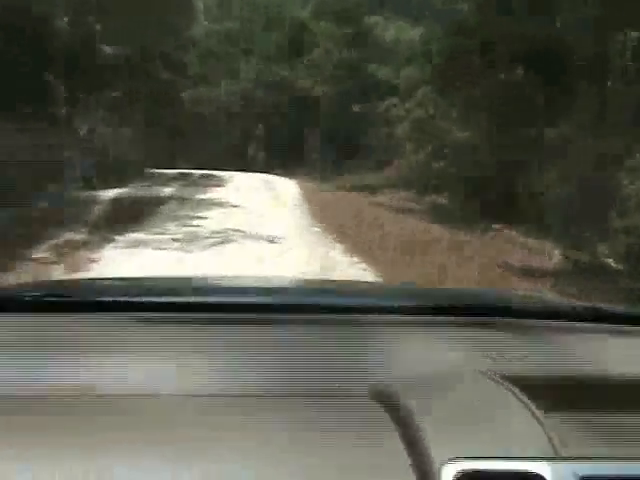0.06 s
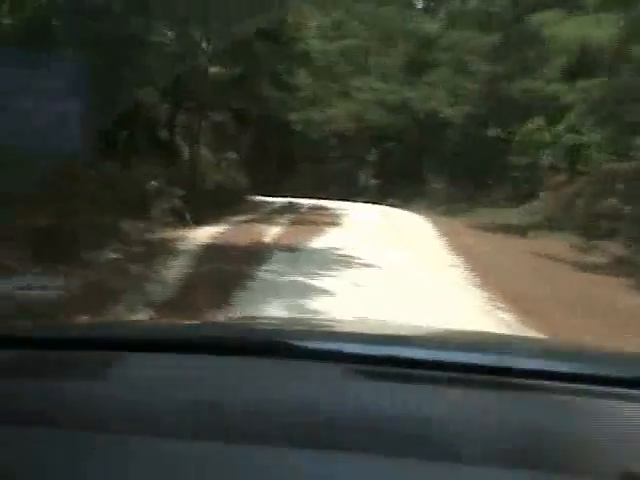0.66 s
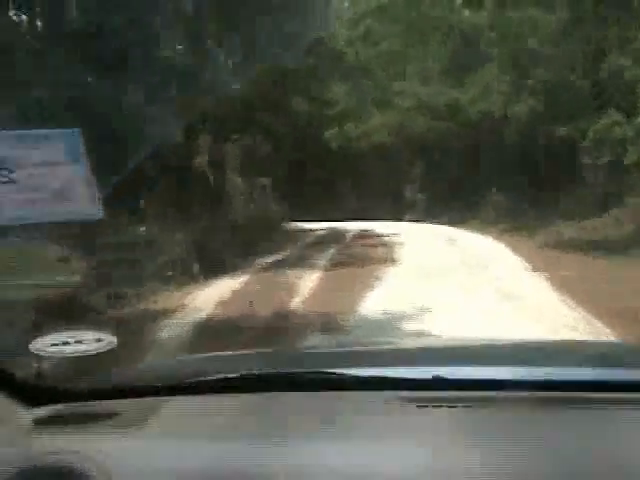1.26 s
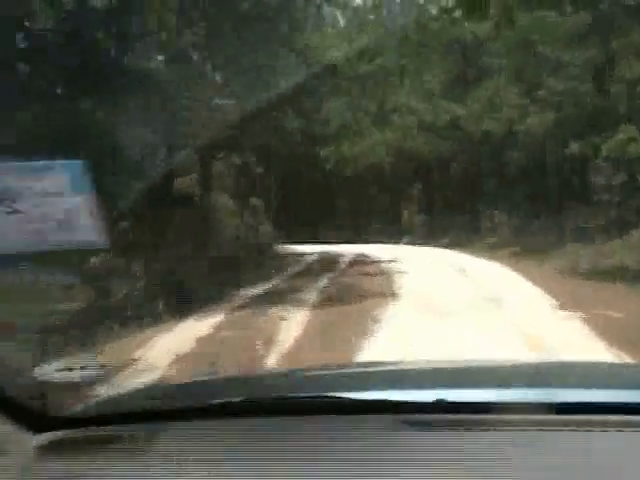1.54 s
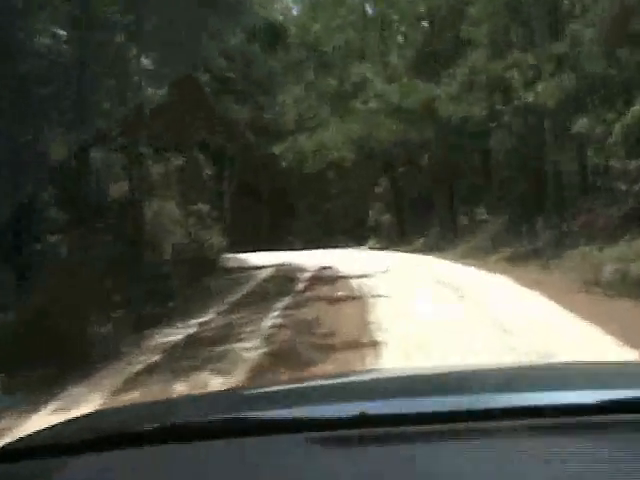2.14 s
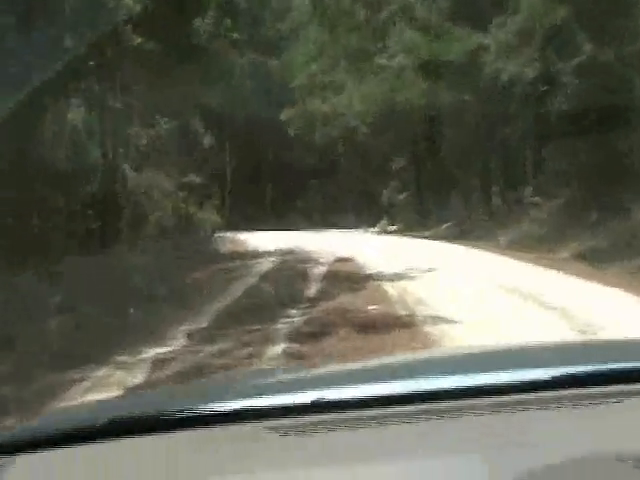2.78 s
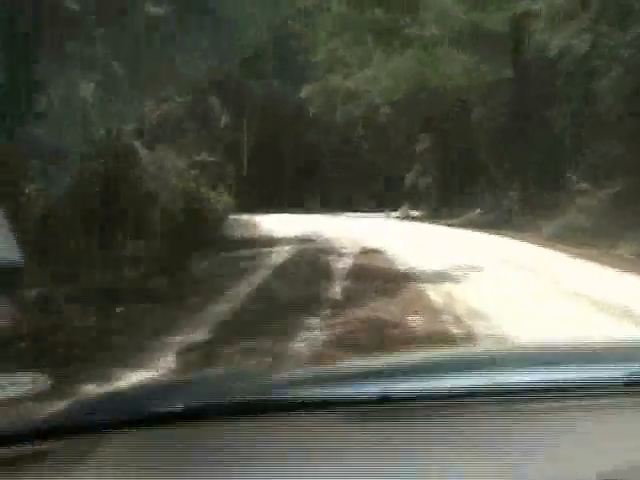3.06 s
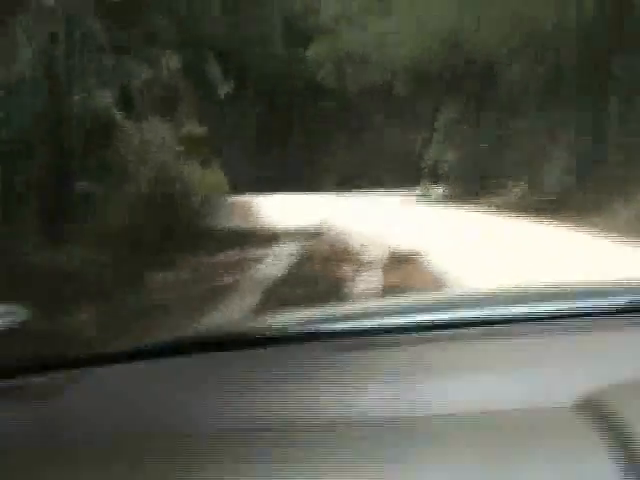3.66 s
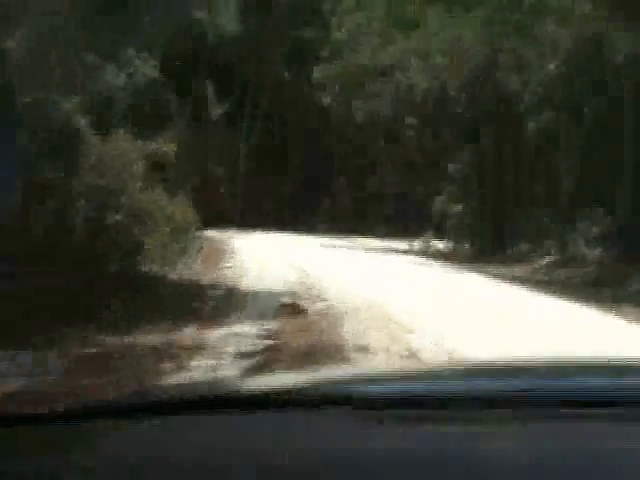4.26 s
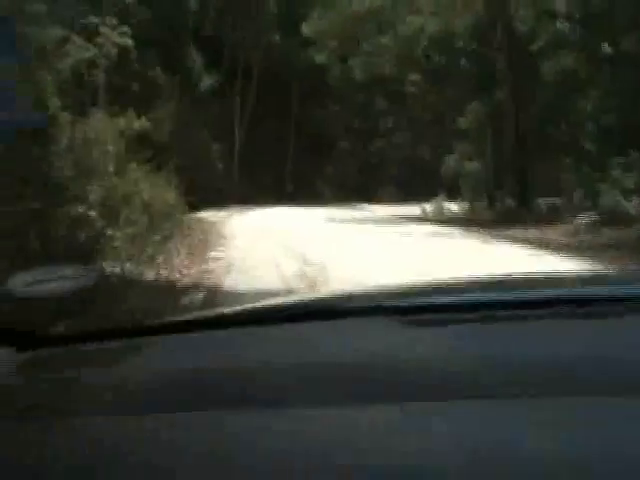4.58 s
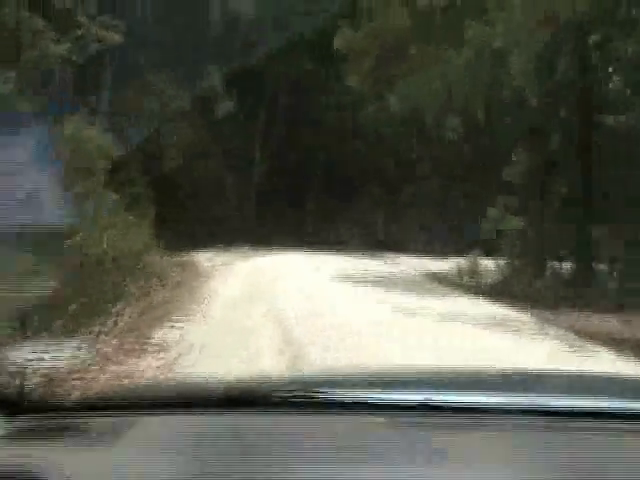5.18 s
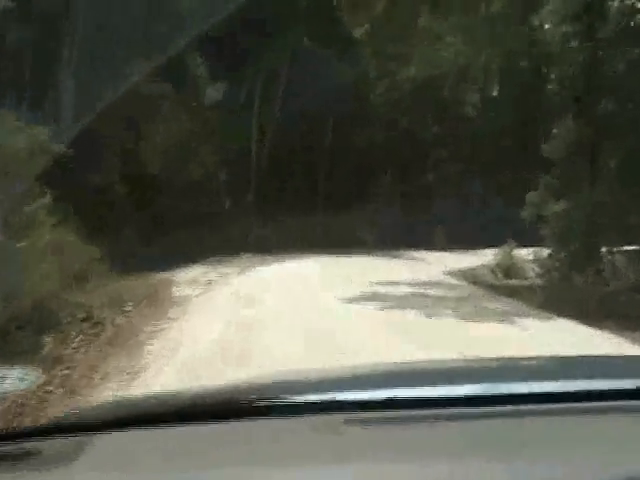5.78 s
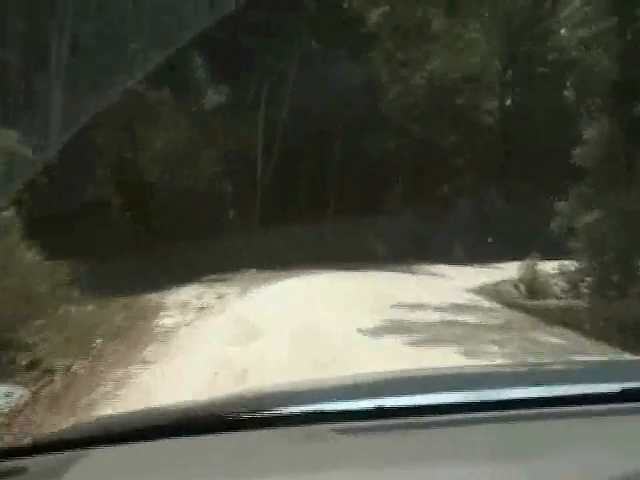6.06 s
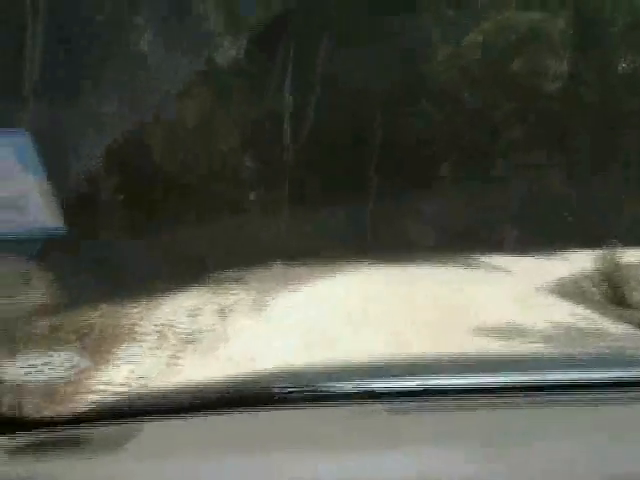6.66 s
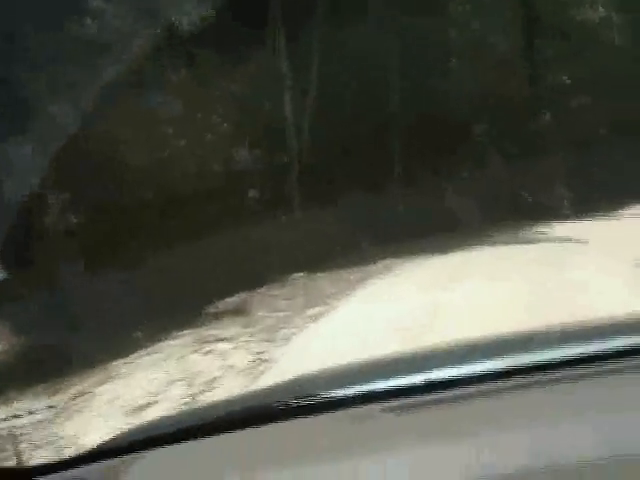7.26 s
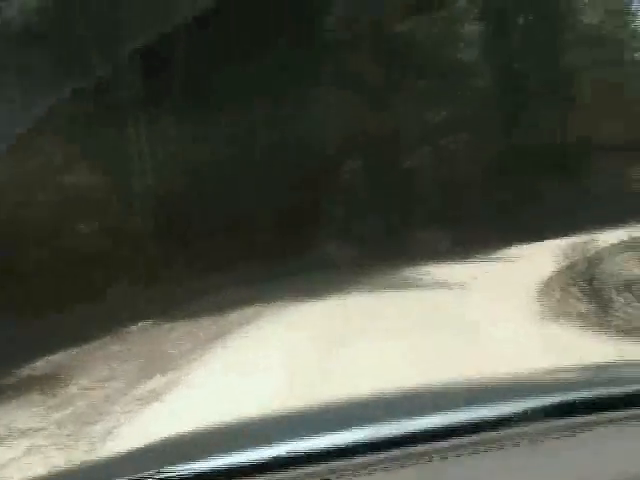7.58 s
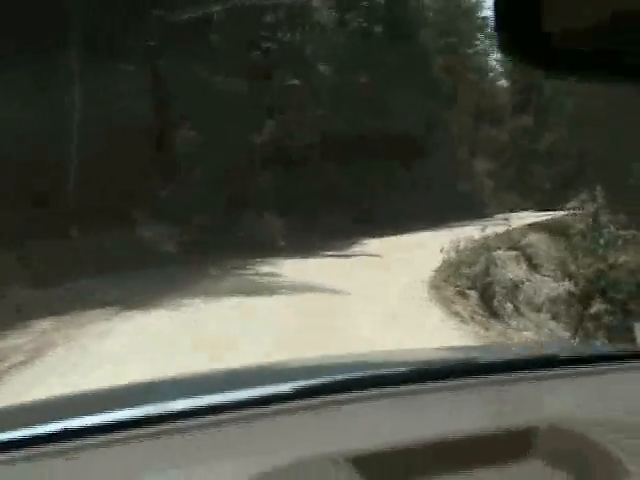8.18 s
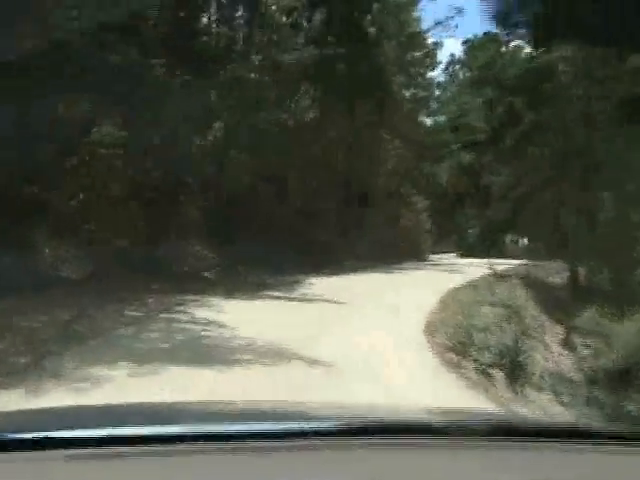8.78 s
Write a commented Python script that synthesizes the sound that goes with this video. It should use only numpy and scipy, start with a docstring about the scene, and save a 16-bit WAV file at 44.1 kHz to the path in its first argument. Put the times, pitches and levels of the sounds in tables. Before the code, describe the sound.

From a microphone inside a truck cab, a deep tyre rumble and a low engine hum run under the crunch of a loose dirt road. Ruts thump through the floor at the start and again late on. Stones strike the underside with short ringing knocks, most thickly around the middle, among light rattles and small squeaks. A droning tone swells and fades, and the engine softens towards the end, over a faint hiss.

```python
"""A boom through the floor and a low rumble: a pickup on a loose dirt road, heard from the cab.
Ruts shake the body, gravel crunches under the tyres, sand sprays in the wheel wells and stones
knock on the underbody. The engine hums and the cab drones; tyres and engine ease off for a bend.
Loose trim rattles and a dry joint squeaks as the truck sways, over a faint sizzle and hiss."""
import sys
import numpy as np
from scipy import signal
from scipy.fft import rfft, irfft
from scipy.io import wavfile
from scipy.ndimage import uniform_filter1d

SR = 44100
rng = np.random.default_rng(int(sys.argv[2]) if len(sys.argv) > 2 else 0)


def write(x):
    x = np.atleast_2d(x).T
    wavfile.write(sys.argv[1], SR, np.round(np.clip(x, -1, 1) * 32767).astype(np.int16))


N = 397782
TIME, FREQS = np.arange(N) / SR, np.fft.rfftfreq(N, 1 / SR)
SIDES = np.array([[1], [-1]])  # plus for the left ear, minus for the right

# how rutted the road is: t/s, roughness/dB
ROAD_ROUGHNESS = [(0, 2), (0.77, 3.5), (1.0, 0.5), (1.25, 3.5), (1.85, 2.5), (3.0, -4), (3.4, 1.5),
                  (4.13, -2.5), (5.0, -0.4), (5.5, 3), (6.75, 2), (7.98, -5.5), (8.35, 0.5)]
# how much loose sand lies on it: t/s, looseness/dB
ROAD_LOOSENESS = [(0, 3.5), (1.0, 1.5), (1.5, 4), (2.75, -5), (3.0, 0.5), (4.75, 3.5), (5.1, 1.4),
                  (6.3, -1), (6.55, 1.5), (7.6, -4.5), (8.35, 2.5)]
# a tyre flings grit into the wheel well: middle t/s, level/dB
GRIT_FLINGS = [(0.105, -43.5), (0.53, -42), (3.35, -43), (3.595, -46), (3.68, -43), (6.51, -43),
               (8.66, -46.5)]
# jolts that boom through the floor: t/s, f/Hz, level/dB
FLOOR_JOLTS = [(0.014, 127, -6), (1.268, 152, -10), (7.027, 125, -7.5), (8.083, 124.5, -11),
               (8.416, 124, -3)]
# stones hitting the underbody: t/s, level/dB, treble share/dB, strongest ring f/Hz
STONE_HITS = [(0.276, -15.5, -13, 1260), (0.433, -19.5, -30, 1290), (0.531, -22.5, -26, 1150),
              (1.526, -24, -29, 1170), (2.667, -18, -28, 1140), (3.283, -26, -19, 1150),
              (3.469, -24, -29, 1190), (3.669, -24, -18, 895), (3.712, -25, -24, 1040),
              (3.745, -19, -43, 820), (3.847, -28, -33, 1160), (3.98, -16, -21, 840),
              (4.127, -21.5, -28, 1140), (4.414, -13.5, -23, 954), (4.627, -12.5, -14, 993),
              (4.679, -21.5, -20, 1120), (4.753, -23.5, -23, 1190), (5.415, -17, -19, 1485),
              (6.071, -22, -36, 860), (6.384, -21.5, -25, 1210), (6.531, -22, -36, 794),
              (6.715, -20.5, -28, 845), (6.991, -20.5, -22.5, 920), (7.939, -24.5, -36, 1110),
              (8.398, -17, -20.5, 1085), (8.414, -13.5, -41, 895), (8.426, -21, -45, 764),
              (8.522, -24, -43, 890), (8.901, -13, -18.5, 1030)]
# the notes the underbody rings at: f/Hz, level/dB, time to fade by 60 dB/s
UNDERBODY_NOTES = [(441, -16, 0.23), (594, -19, 0.044), (670, -9, 0.061), (927, -5, 0.11),
                   (1166, -4.5, 0.16), (1523, -4, 0.07), (2070, -4, 0.048)]
# the engine, easing off for the bend: t/s, firing f/Hz, level/dB
ENGINE_COURSE = [(0, 59.2, -38), (1.2, 58.6, -34.5), (2.5, 57.6, -40), (3.3, 56.6, -37), (4.1, 55.7, -39.5),
                 (5.5, 55.6, -35), (6.8, 58.3, -35.5), (7.5, 55.5, -45), (9.02, 54, -45)]
# the tones in its hum: multiple of the firing rate, relative level/dB
ENGINE_HARMONICS = [(1, 3), (2, 10.5), (3, -5), (4, -4.5), (5, 3.5), (9, -17)]
# drones of the cab: middle t/s, half length/s, f/Hz, level/dB
CAB_DRONES = [(4.8, 0.92, 201.5, -33.5), (5.898, 0.9, 181.8, -24), (7.59, 1, 125.4, -24.5)]
# ticks of loose trim and small metal parts: t/s, level/dB, ring f/Hz
TRIM_TICKS = [(2.0276, -33.5, 6000), (2.135, -41.5, 8300), (2.324, -34, 7100), (2.9163, -38.5, 6400),
              (3.037, -36, 8550), (3.168, -34.5, 3120), (3.44, -37, 3400), (4.663, -36, 3220),
              (5.102, -35, 3130), (6.022, -36.5, 4100), (6.052, -37, 4000), (6.285, -37.5, 4160),
              (6.345, -39, 3150), (7.491, -38, 8500), (7.749, -38.5, 2750), (8.24, -37, 3240),
              (8.708, -39, 3250)]
# chirps of the dry joint: middle t/s, level/dB, f/Hz
JOINT_CHIRPS = [(2.882, -40, 2210), (3.012, -35, 2210), (3.35, -38, 2260), (4.075, -40, 2310),
                (4.162, -37, 2325), (4.535, -37, 2320), (4.605, -38, 2300), (6.36, -42, 2235),
                (6.71, -44, 2370), (7.744, -39, 2250), (7.904, -36.5, 2260), (8.497, -37, 2340),
                (8.875, -37, 2240), (8.935, -37, 2250)]
# the high sizzle coming and going: t/s, level/dB
SIZZLE_COURSE = [(0, -83), (4, -60), (6.4, -66.5), (6.7, -87)]

# The colour of each noise, or how strong it is from low to high: f/Hz, relative level/dB
SHAKE_COLOUR = [(10, -58.5), (22, 2.5), (33, 10), (39, 8), (46, -0.5), (60, 5), (85, 2.5), (105, -5),
                (160, -66.5)]  # the shaking body
RUMBLE_COLOUR = [(60, -26), (100, -7.5), (121, 2), (145, -8), (180, -8), (260, -17), (300, -16),
                 (345, -21.5), (410, -21), (460, -26), (510, -21), (600, -37.5), (1000, -41), (3000, -99)]  # the tyre tread
GRAVEL_COLOUR = [(250, -4), (600, 4), (1000, -2.5), (1550, -6.5), (2200, -13.5), (3000, -22), (5000, -28),
                 (12000, -42)]  # crunching gravel
SAND_COLOUR = [(1200, -3.5), (2800, 14), (4200, 7.5), (7500, 4.5), (9200, -5.5), (13000, -8)]  # spraying sand
PEBBLE_COLOUR = [(400, -9), (850, 15.5), (1250, 3), (2500, -12), (9000, -18)]  # pattering pebbles
KNOCK_COLOUR = [(100, -7.5), (400, 11), (800, 4.5), (1300, 0.5), (2200, -4.5), (4000, -12.5), (9000, -38.5)]  # a stone's dull knock
CRACK_COLOUR = [(800, -9), (2200, 8.5), (4200, 6.5), (8000, 2.5), (13000, -13.5)]  # a stone's sharp crack
TRIM_COLOUR = [(1000, 3), (2600, 14.5), (8200, 4), (13000, -24)]  # loose trim
SIZZLE_COLOUR = [(9400, -18), (10400, 11), (11700, 1), (12900, 9), (13500, -7)]  # the high sizzle
HISS_COLOUR = [(10500, 3), (13000, -10)]  # microphone hiss

# how wide the sound is: f/Hz, level of what differs between the ears against what they share/dB
STEREO_WIDTH = [(60, -33), (130, -15), (280, -6), (600, -9), (1800, -4.5), (5000, -14), (13000, -15)]
# the bass is louder on the left: f/Hz, left minus right level/dB
LEFT_LEAN = [(100, 4.1), (370, 2), (670, .4), (8000, 0)]


def road(bend_s=7.1, fling_half_s=0.033):
    """Ruts shake the body and rumble in the tread; gravel crunches, pebbles patter and sand sprays."""
    (rough,), (loose,) = curves(ROAD_ROUGHNESS), curves(ROAD_LOOSENESS)
    slowed = np.clip(TIME - bend_s, 0, 1)  # the truck takes one second to slow for the bend
    shake = steady(noise(SHAKE_COLOUR), seconds=0.17) * undb(-17 + rough)
    rumble_db = -20 + 0.54 * rough - 2.5 * slowed + wander(6)
    rumble = steady(noise(RUMBLE_COLOUR), seconds=.15) * undb(rumble_db)
    gravel = grains(GRAVEL_COLOUR, per_s=560, scatter_db=2.0, t60=.08)
    sand = grains(SAND_COLOUR, per_s=380, scatter_db=2.5, t60=.06)
    pebbles = grains(PEBBLE_COLOUR, per_s=7.4, scatter_db=2.0, t60=.06) * undb(-18)
    patch_db = 1.5 * wander(17)  # loose and packed patches take turns
    gravel_db = -35 + 0.081 * rough + 0.35 * loose - 3 * slowed + patch_db / 2
    sand_db = -52.5 + 1.22 * loose + patch_db
    flung = sum(undb(db) * bell(TIME - s, fling_half_s) for s, db in GRIT_FLINGS)
    gravel_gain = np.hypot(undb(gravel_db), flung * undb(8))  # a fling is more coarse grit than fine
    sand_gain = np.hypot(undb(sand_db), flung)
    return shake + rumble + (gravel + pebbles) * gravel_gain + sand * sand_gain


def jolts(swell_s=0.014):
    """A wheel hits a rut and the floor booms for a few cycles."""
    t, out = TIME[:SR // 5], np.zeros((2, N))
    swell = (t / swell_s * np.exp(1 - t / swell_s)) ** 2
    for s, hz, db in FLOOR_JOLTS:
        add(out, s, undb(db) * swell * np.sin(2 * np.pi * hz * t))
    return out


def stones(ring_db=-10.5, spot_db=-6, knock_db=-4.5, slap_s=.012, slap_db=-16):
    """Each stone cracks and knocks; the underbody rings, most of all at the spot that is struck."""
    t = TIME[:SR // 5]
    hz, note_db, t60 = np.transpose(UNDERBODY_NOTES)[:, :, None]
    contact = (1 - np.exp(-t / .0003)) * (1 + .35 * np.exp(-t / .004))  # a fast rise that overshoots
    knock_noise, crack_noise, out = noise(KNOCK_COLOUR), noise(CRACK_COLOUR), np.zeros((2, N))
    for k, (s, db, treble_db, spot_hz) in enumerate(STONE_HITS):
        part = slice(k * len(t), (k + 1) * len(t))
        detune, place, left, right = rng.standard_normal((4, len(UNDERBODY_NOTES), 1))
        notes = undb(note_db + 2 * place) * fade(t, t60)  # each landing place favours other notes
        phase = 2 * np.pi * hz * (1 + 0.02 * detune) * t + np.pi * np.sign(place) / 2
        ring = np.array([np.sum(notes * np.sin(phase + side / 2), axis=0) for side in (left, right)])
        spot = np.sin(2 * np.pi * spot_hz * t + SIDES / 2) * fade(t, t60=0.06)
        knock = knock_noise[:, part] * fade(t, t60=0.083)
        crack = crack_noise[:, part] * fade(t, t60=0.089)
        body = undb(ring_db) * ring + undb(spot_db) * spot + undb(knock_db) * knock
        cutoff_hz = 15900 * undb(treble_db / 2)  # softer blows are duller
        smoothing = np.exp(-2 * np.pi * cutoff_hz / SR)
        body = signal.lfilter([1 - smoothing], [1, -smoothing], body)
        force = contact * undb(db)
        add(out, s, force * (body + undb(treble_db) * crack))
        for bounce, late in enumerate(rng.random(2), 1):  # the struck panel slaps back twice
            add(out, s + slap_s * (bounce + late / 2), force * body * undb(slap_db) / bounce)
    return out


def engine(waver_db=3.14):
    """The engine's firing makes a low hum whose tones waver with the uneven load."""
    hz, db = curves(ENGINE_COURSE)
    phase = 2 * np.pi * np.cumsum(hz * (1 + 0.00371 * wander(14))) / SR
    out = 0
    for multiple, share_db in ENGINE_HARMONICS:
        lag = SIDES * 0.0017 * hz * multiple  # higher tones reach the two ears out of step
        gain = undb(db + share_db + waver_db * wander(12))
        out = out + gain * np.sin(multiple * phase + 0.14 * wander(14) - lag)
    return out


def cab_drone(waver_db=2):
    """The cab booms at one pitch for a while, swelling and dying away."""
    out = 0
    for s, half_s, hz, db in CAB_DRONES:
        swell = undb(db + waver_db * wander(8.2)) * bell(TIME - s, half_s)
        out = out + swell * np.sin(2 * np.pi * hz * TIME + .4 * wander(8))
    return out


def trim_rattle(bounce_db=-8, click_db=-2, ring_cycles=5):
    """A loose part gives a dry tick with a hint of its own pitch, then two weaker bounces."""
    t = TIME[:SR // 5]
    power, rings = np.zeros((1, N)), np.zeros((2, N))
    for s, db, hz in TRIM_TICKS:
        for bounce, gap_s in enumerate(rng.uniform(.006, .02, 3)):
            envelope = undb(db + bounce_db * bounce) * fade(t, t60=.04)
            rasp = unit(uniform_filter1d(rng.standard_normal(len(t)), int(ring_cycles * SR / hz) + 1))
            add(power, s, envelope ** 2)
            add(rings, s, envelope * rasp * np.sin(2 * np.pi * hz * t + SIDES / 2))
            s += gap_s
    return undb(click_db) * np.sqrt(power) * noise(TRIM_COLOUR) + rings


def joint_squeaks(creak_hz=2286, overtone_db=-17):
    """A dry joint rubs as the truck sways: a faint, fitful creak that breaks into raspy chirps."""
    t = TIME[:SR // 5] - .1  # zero is the middle of a chirp
    slip = .028 * wander(900)  # roughens the pitch
    grip = unit(undb(3.2 * wander(330)))  # roughens the loudness
    creak = np.sin(2 * np.pi * np.cumsum(creak_hz * (1 + 4 * slip)) / SR + SIDES / 2)
    fits = unit(undb(6 * np.tanh(wander(30))))
    out = creak * grip * fits * undb(-55 + curves(ROAD_ROUGHNESS)[0] / 2)
    scoop = .055 / (1 + np.exp((t + .006) / .004))  # each chirp slides up to its pitch
    for k, (s, db, hz) in enumerate(JOINT_CHIRPS):
        part = slice(k * len(t), (k + 1) * len(t))
        slide, stretch = rng.random(2)  # no two rubs slide as far or last as long
        phase = 2 * np.pi * np.cumsum(hz * (1 - slide * scoop + slip[part])) / SR
        tone = np.sin(phase + SIDES / 2) + undb(overtone_db) * np.sin(2 * phase)
        swell = bell(t, half_s=0.02 / np.sqrt(.5 + stretch))
        add(out, s + t[0], undb(db) * grip[part] * swell * tone)
    return out


def sizzle():
    """A faint, very high sizzle flickers as it comes and goes."""
    return noise(SIZZLE_COLOUR) * undb(curves(SIZZLE_COURSE)[0] + 2 * wander(30))


def hiss(level_db=-58):
    """The steady, thin hiss of the microphone."""
    return noise(HISS_COLOUR) * undb(level_db)


def grains(colour, per_s, scatter_db, t60):
    """A hail of small hits of uneven size, each smeared by the panel it strikes."""
    sizes = undb(scatter_db * np.minimum(rng.exponential(size=N), 4))
    hits = (rng.random(N) < per_s / SR) * sizes ** 2
    power = signal.fftconvolve(hits, fade(TIME[:SR // 4], t60) ** 2)[:N]
    envelope = np.sqrt(np.abs(power))
    return noise(colour) * steady(envelope[None] + 1e-3, seconds=.25)


def noise(colour):
    """Stereo noise of the given colour and strength 1, nearly alike in both ears in the bass."""
    shared, different = tint(rng.standard_normal((2, N)), colour)
    side = irfft(rfft(different) * undb(spectrum(STEREO_WIDTH)), N)
    return unit(shared + SIDES * side)


def tint(x, colour):
    """Filter a sound to the given colour."""
    cepstrum = irfft(np.log(undb(spectrum(colour))), N)
    cepstrum[1:N // 2] *= 2  # folded forward, so the filter rings only after a sound, never before
    cepstrum[N // 2 + 1:] = 0
    return irfft(rfft(x) * np.exp(rfft(cepstrum)), N)


def spectrum(points):
    """Join (f/Hz, level/dB) points by straight lines, with octaves evenly spaced."""
    hz, db = np.transpose(points)
    return np.interp(np.log(FREQS + 1), np.log(hz), db)


def curves(table):
    """Join each column of a table by straight lines in time."""
    s, *columns = np.transpose(table)
    return [np.interp(TIME, s, column) for column in columns]


def wander(per_s):
    """A curve of strength 1 that glides to a new random value per_s times a second."""
    values = rng.standard_normal(4096)
    steps = values[(TIME * per_s).astype(int) % len(values)]
    return unit(uniform_filter1d(steps, max(int(SR / per_s), 1)))


def steady(x, seconds):
    """Even out the slow swells of a noise."""
    return x / np.sqrt(uniform_filter1d(np.mean(x ** 2, axis=0), int(seconds * SR)))


def bell(t, half_s):
    """A smooth swell: 1 at t = 0, about a third half_s seconds to either side."""
    return np.exp(-(t / half_s) ** 2)


def fade(t, t60):
    """Die away by 60 dB every t60 seconds."""
    return undb(-60 * t / t60)


def undb(db):
    """Turn decibels into a factor to multiply by."""
    return 10 ** (np.asarray(db) / 20)


def unit(x):
    """Scale to an average strength (rms) of 1."""
    return x / np.sqrt(np.mean(x ** 2))


def add(out, s, sound):
    """Mix a short sound in at s seconds."""
    i = max(int(s * SR), 0)
    out[:, i:i + sound.shape[-1]] += sound[..., :max(N - i, 0)]


def scene():
    """Everything as it arrives in the cab, the bass leaning left."""
    cab = engine() + cab_drone() + road() + stones() + trim_rattle() + joint_squeaks() + jolts()
    cab += sizzle()
    return irfft(rfft(cab) * undb(SIDES * spectrum(LEFT_LEAN) / 2), N) + hiss()


def record(dry, top_hz=13300):
    """The camera rounds off the very highest peaks and cuts the top of the treble."""
    rounded = dry / (1 + dry ** 8) ** (1 / 8)
    return signal.sosfilt(signal.ellip(8, .2, 70, top_hz, fs=SR, output="sos"), rounded)


dry = scene()
out = record(dry)
write(out)
```